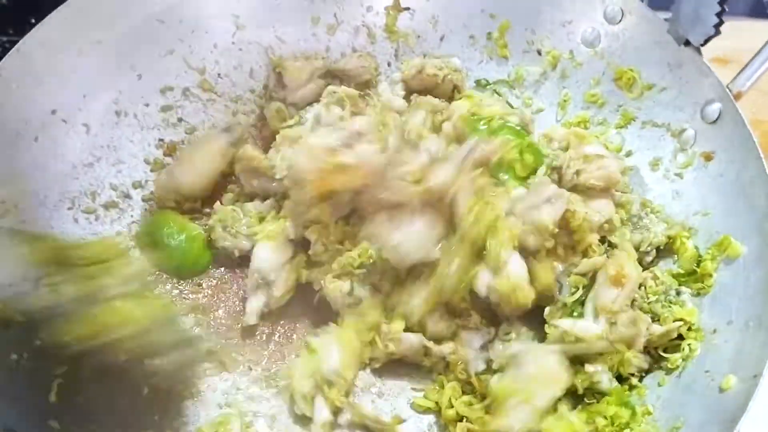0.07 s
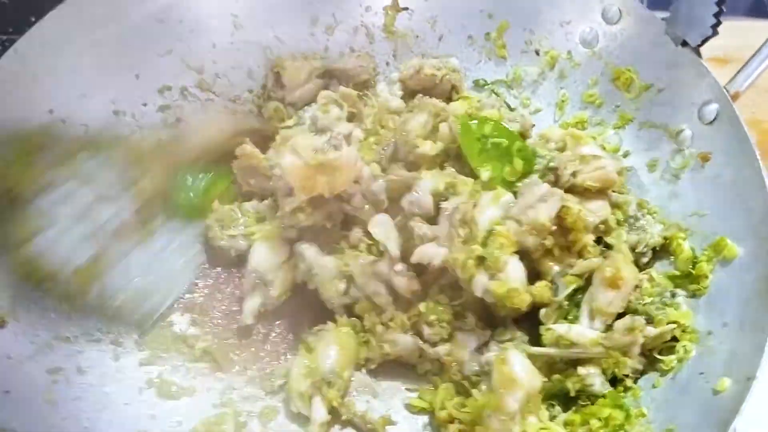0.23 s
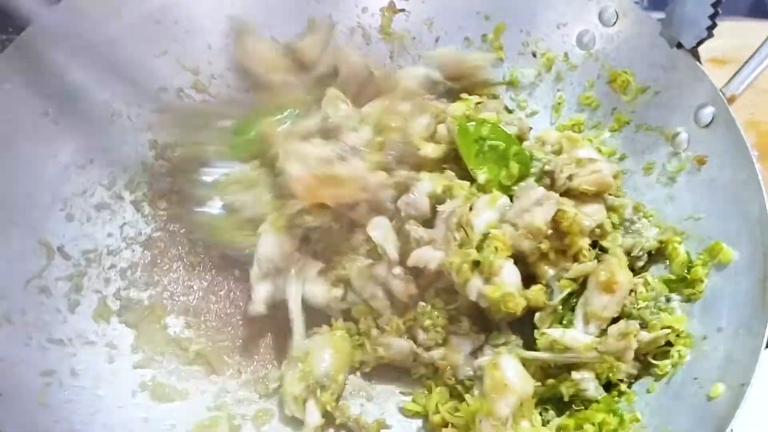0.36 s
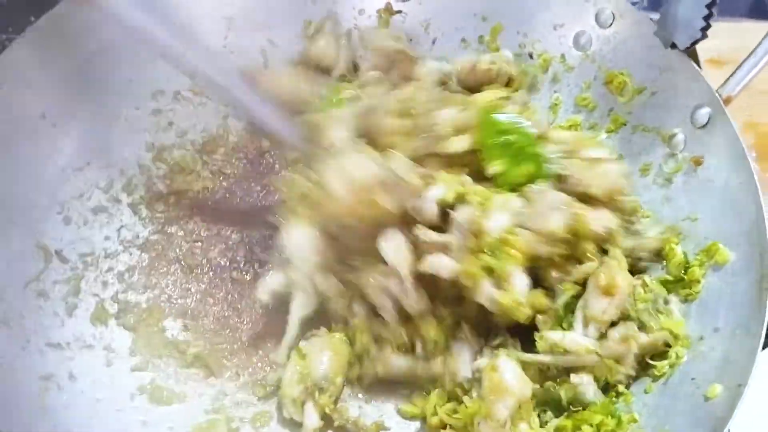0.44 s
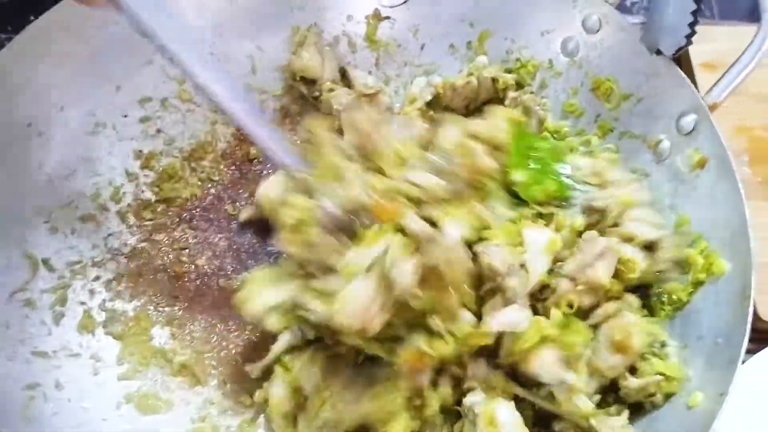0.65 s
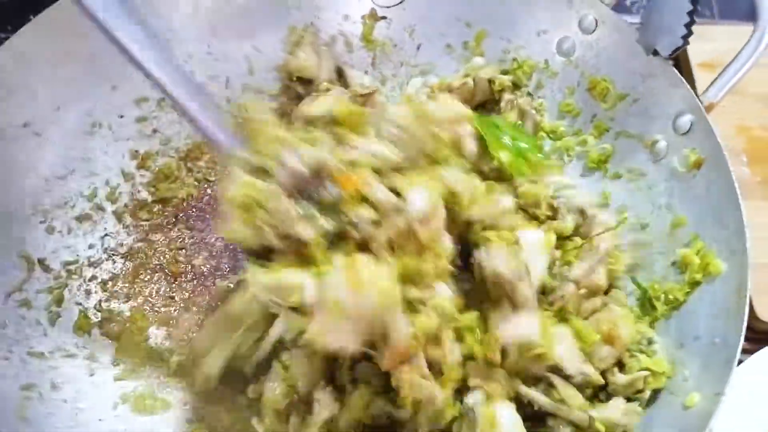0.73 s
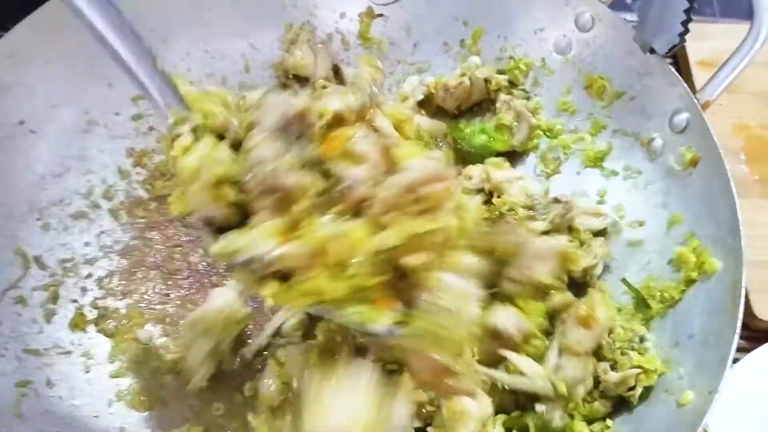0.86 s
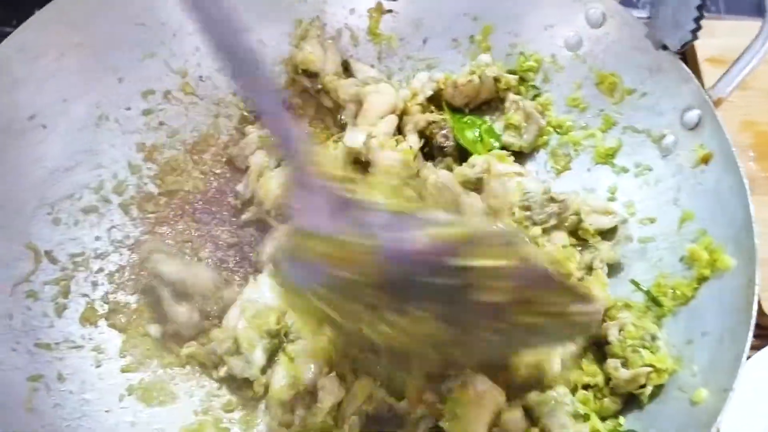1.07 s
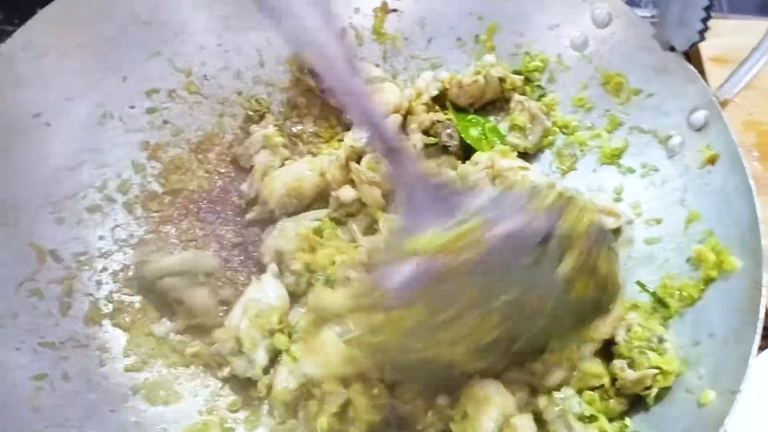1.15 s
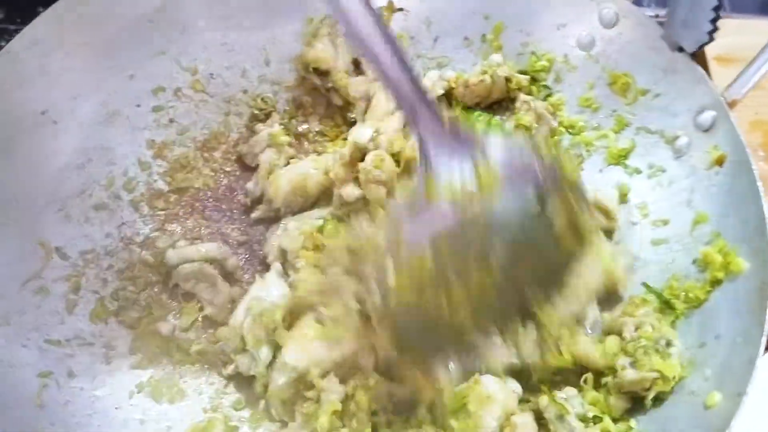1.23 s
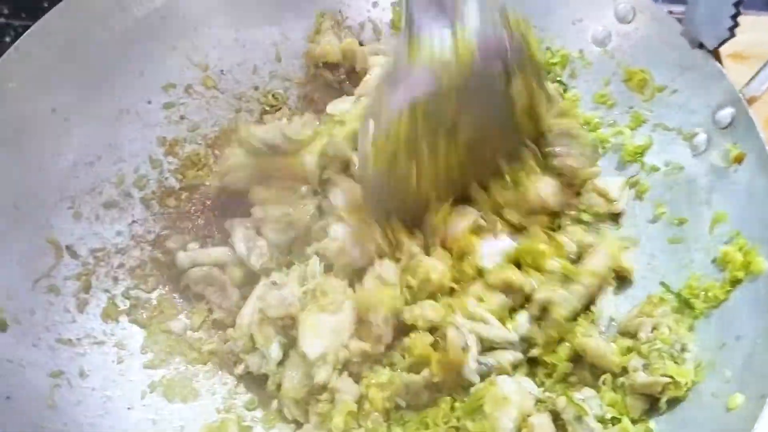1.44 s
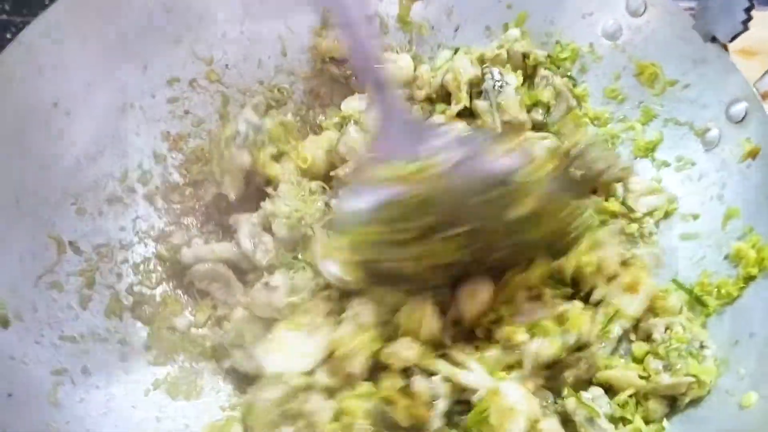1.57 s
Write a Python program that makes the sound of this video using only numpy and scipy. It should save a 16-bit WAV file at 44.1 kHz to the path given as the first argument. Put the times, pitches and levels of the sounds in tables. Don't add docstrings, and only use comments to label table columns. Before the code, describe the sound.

Steel spatula scraping and clanking in a wok, then light taps, over a constant fine sizzle

```python
import sys
import numpy as np
from scipy import signal
from scipy.fft import rfft, irfft
from scipy.io import wavfile
from scipy.ndimage import uniform_filter1d

SR = 44100
rng = np.random.default_rng(int(sys.argv[2]) if len(sys.argv) > 2 else 0)


def to_linear_factor(level_db):
    exponent = np.asarray(level_db, float) / 20
    return 10 ** exponent


def unload_audio(sound):
    columns = np.transpose(np.atleast_2d(sound))
    steps = np.round(np.clip(columns, -1, 1) * 32767)
    wavfile.write(sys.argv[1], SR, steps.astype(np.int16))


N = 70560

# pitch_hz, level_db [per Hz]
AIR_COLOUR = [(20, -27), (60, -1), (140, -7.5), (330, -7), (550, 0.5), (1300, 0.5), (2300, -7), (3500, -23),
              (6000, -43)]
# start_s, sizzle_db, large_bubbles_db
PAN_HEAT = [(0, -41.5, -0.5), (0.119, -41, -0.5), (0.198, -46, 4), (0.301, -44.5, 8.5), (0.353, -32.5, -3),
            (.5, -38.5, -24), (0.528, -36.5, 10.5), (.66, -36.5, 0), (.78, -41, -10), (.86, -43, -1),
            (.95, -44.5, -1), (1.05, -45.5, 0.5), (1.1, -43, 9.5), (1.3, -46.5, 1.5), (1.399, -46, 2.5),
            (1.472, -42, 6), (1.53, -43, 1), (1.6, -44.5, 10)]
# pitch_hz, level_db [per Hz]
SIZZLE_COLOUR = [(880, -42.5), (1500, -13.5), (1940, -2), (2290, -5), (3500, -4.5), (3790, -9.5),
                 (4350, -5), (11400, 3), (15800, -14)]
# start_s, level_db
PAN_ROCKING = [(0, -76), (.16, -47), (.21, -31), (.3, -34), (.35, -25), (.5, -51), (.68, -91), (.87, -67),
               (.91, -50), (1.04, -50.5), (1.09, -53), (1.17, -38.5), (1.32, -58), (1.6, -63)]
# pitch_hz, level_db, t60_s
BOWL_MODES = [(165, -5, 0.03), (246, -11.5, 0.12), (357, -5.5, 0.072), (450, -2, 0.032), (520, 4, 0.056),
              (568, -0.5, 0.051), (607.4, 1, 0.035), (681, -5, 0.073), (838, -5, 0.047), (940, -11, 0.025),
              (1072, -1.5, 0.053)]
# pitch_hz, level_db, t60_s
WALL_MODES = [(1170, 0, .02), (1290, 0, 0.025), (1340, -5, 0.05), (1420, 1, 0.02), (1540, 0, .02),
              (1670, 2, 0.025), (1810, 0, .025)]
# pitch_hz, level_db, t60_s
BLADE_MODES = [(2038, 5, 0.035), (2057, -7, 0.069), (2240, -1.5, 0.044), (2150, 7, 0.028), (2243, 7, 0.046),
               (2434, 14, 0.013), (2760, 5, 0.022), (3276, 12.5, 0.015), (3570, -32, 0.029),
               (3960, -19, 0.014), (4090, 0, 0.018), (5040, -21, .06)]
# pitch_hz, level_db [per Hz]
RASP_COLOUR = [(1470, 3), (2500, -1.5), (2850, -1.5), (4010, 1.5), (5790, -15.5), (6740, -0.5), (9290, -11),
               (12800, -51), (15500, -46)]
# start_s, edge_pressure_db, bowl_load_db, place [0 bowl floor to 1 wall]
LONG_STROKE = [
    (.2, -46, -87, 0.061),
    (.215, -47.5, -45.5, 0.029),
    (.31, -74, -38, 0.015),
    (.335, -36, -35, 0.014),
    (.41, -31.5, -31, 0.037),
    (.46, -35, -31.5, 0.69),
    (.53, -33.5, -36.5, 0.64),
    (.6, -31, -39, 0.32),
    (.65, -45, -50.5, 0.89),
    (.86, -58, -58.5, 0.14),
]
# start_s, edge_pressure_db, bowl_load_db, place [0 bowl floor to 1 wall]
LIGHT_TOSS = [
    (.9, -54, -50.5, 0.06),
    (1.0, -56.5, -85, 0.65),
    (1.06, -58, -88, 0.6),
    (1.07, -42, -42.5, 0.65),
    (1.13, -56, -55, 0.1),
    (1.18, -62, -48, 0.8),
    (1.29, -58, -88, 0.6),
    (1.37, -54.5, -42.5, 0.13),
    (1.46, -99, -93, 0),
]
# start_s, length_s, pitch_hz,
# end_pitch_hz, width_hz
SINGING_RUBS = [(.322, .03, 2250, 2250, 120), (.5, .13, 2120, 2080, 120), (.63, .2, 2620, 2600, 200),
                (.64, .2, 2200, 2000, 250), (.6, .12, 520, 520, 90), (.72, .22, 520, 510, 60),
                (.98, .08, 1335, 1335, 50), (.98, .06, 2200, 2200, 50), (1.015, .045, 3300, 3200, 120),
                (1.165, .05, 1335, 1335, 60), (1.18, .08, 1670, 1670, 80), (1.17, .07, 2230, 2260, 90),
                (1.352, .06, 620, 900, 110), (1.38, .04, 1050, 1100, 80), (.21, .12, 1000, 900, 500),
                (.55, .12, 1300, 1300, 500), (.14, .07, 2150, 2150, 100), (.7, .2, 9200, 9600, 1500),
                (1.3, .09, 3150, 3300, 250)]
SINGING_LEVELS = [-29.5, -25.5, -40, -41, -43.5, -49.5, -48, -50, -46, -37, -43, -42, -41.5, -49.5, -35,
                  -45, -49, -37.5, -45]
# start_s, peak_db, pitch_hz, t60_s
TICKS = [(.322, -26, 300, .03), (.34, -24, 430, .04), (.364, -21, 3820, .03), (.375, -23, 3800, .04),
         (.391, -19, 3760, .025), (.4171, -16, 3950, .015), (.44, -23, 500, .04), (.45, -20, 2260, .03),
         (.474, -17, 1490, .02), (.496, -17, 2280, .02), (.504, -15, 2590, .03), (.536, -18, 2100, .03),
         (.548, -14, 2100, .06), (.573, -16, 2090, .08), (.58, -15, 2075, .07), (.591, -18, 520, .03),
         (.603, -17, 2080, .05), (.604, -20, 650, .03), (.8775, -28, 2250, .012), (.878, -26, 2800, .012),
         (.895, -33, 3000, .03), (.943, -35, 1340, .07), (1.014, -30, 1340, .06), (1.014, -36, 2200, .04),
         (1.159, -19, 1340, .03), (1.159, -20, 1650, .025), (1.159, -22, 2200, .03),
         (1.159, -26, 3200, .015), (1.236, -36, 2250, .06), (1.237, -39, 1335, .07), (1.26, -35, 2280, .04),
         (1.323, -38, 550, .04), (1.364, -34, 600, .04), (1.288, -36, 3000, .012), (1.52, -35, 1400, .02)]
# start_s, peak_db, colour_hz, hardness_db
BLOWS = [(0.207, -12, 648, -22), (0.363, -12.5, 493, -15), (0.392, -20, 500, -8), (0.416, -9, 516, -16),
         (0.476, -12, 520, -12.5), (0.493, -13.5, 560, -33), (0.504, -11.5, 530, -23),
         (0.523, -9.5, 2500, -7.5), (0.877, -22.5, 2880, -7.5), (1.065, -28.5, 554, 10),
         (1.145, -33, 546, 2.5), (1.158, -14, 1470, -27), (1.168, -26.5, 537, -16),
         (1.289, -32.5, 2540, -8), (1.306, -30.5, 530, -29), (1.356, -31, 660, -25)]

GRIT_PER_S, GRIT_SPREAD_DB = 5000, 3.35
EAR_LAG_S, LEAN_DB = 0.0002177, -0.5
SCATTER_HZ = 1250


def evened(x):
    return x / np.sqrt(np.mean(x ** 2) + 1e-20)


def band(x, lo_hz, hi_hz, order=2):
    return signal.sosfilt(signal.butter(order, [lo_hz, hi_hz], "band", fs=SR, output="sos"), x)


def coloured(x, points):
    f, db = np.transpose(points)
    log_hz = np.log(np.fft.rfftfreq(x.shape[-1], 1 / SR) + 1)
    outside = np.maximum(np.log(f[0]) - log_hz, 0) + np.maximum(log_hz - np.log(f[-1]), 0)
    gain_db = np.interp(log_hz, np.log(f), db) - 20 * outside
    return irfft(rfft(x) * to_linear_factor(gain_db), x.shape[-1])


def drift(per_s):
    size = max(int(SR / per_s), 2)
    return evened(uniform_filter1d(uniform_filter1d(rng.standard_normal(N), size), size))


def clicks(per_s, spread_db, shape):
    size = to_linear_factor(spread_db * np.minimum(rng.exponential(1, shape), 5))
    size = size * rng.choice([-1., 1.], shape)
    return evened(size * (rng.random(shape) < per_s / SR))


def placed(x):
    hz = np.fft.rfftfreq(len(x), 1 / SR)
    late = irfft(rfft(x) * np.exp(-2j * np.pi * hz * EAR_LAG_S), len(x))
    return np.array([late * to_linear_factor(LEAN_DB / 2), x * to_linear_factor(-LEAN_DB / 2)])


def spread_out(x, apart=1):
    return placed(x[0]) + apart * x[1:]


def air():
    murmur = coloured(spread_out(rng.standard_normal((3, N)), apart=0.25), AIR_COLOUR)
    return to_linear_factor(-53 + 0.5 * drift(8.1)) * evened(murmur)


def kitchen(x):
    t60_s, level_db, wide_hz, dull_hz = 0.3, -9.5, 920, 7400
    t = np.arange(int(.4 * SR)) / SR
    taps = clicks(2000, 0, (3, len(t))) * to_linear_factor(-60 * t / t60_s) * (t > .004)
    taps = band(taps[:2] - taps[2], wide_hz, 16000) + taps[2]
    taps = band(taps, 160, dull_hz, order=1)
    return signal.fftconvolve(x[None], to_linear_factor(level_db) * taps / np.linalg.norm(taps[0]), axes=1)[:, :N]


def rocking():
    s, db = np.transpose(PAN_ROCKING)
    low = evened(band(rng.standard_normal(N), 111, 206, order=3))
    return placed(low * to_linear_factor(np.interp(np.arange(N) / SR, s, db) - 8 + drift(31)))


def sizzle():
    pops_per_s, pop_spread_db, pop_share = 1800, 5, 0.37
    level_db, flicker_db, patch_db, large_hz = 4, 1, 2.2, 7140
    s, db, large_db = np.transpose(PAN_HEAT)
    level = to_linear_factor(np.interp(np.arange(N) / SR, s, db) + level_db + flicker_db * drift(39.0))
    pops = evened(spread_out(clicks(pops_per_s, pop_spread_db, (3, N))))
    hiss = rng.standard_normal((2, N))
    fizz = coloured(pop_share * pops + (1 - pop_share) * hiss, SIZZLE_COLOUR)
    hz, t, z = signal.stft(fizz, SR, nperseg=256, noverlap=192)
    hz = hz[:, None]
    patch = uniform_filter1d(rng.standard_normal(z.shape[1:]), size=3, axis=0)
    patch = evened(uniform_filter1d(patch, size=50, axis=1))
    large = np.interp(t, s, large_db) / (1 + (hz / large_hz) ** 6) * (hz > 3000)
    z = z * to_linear_factor(patch_db * patch + large)
    return level * signal.istft(z, SR, nperseg=256, noverlap=192)[1][:, :N] / fizz.std()


def ring(modes, weight=None, size=9000):
    hz, db, t60 = np.transpose(modes)[:, :, None]
    t = np.arange(size) / SR
    w = rng.choice([-1., 1.], hz.shape) if weight is None else weight(hz)
    turn_rad = rng.uniform(-1.43, 1, hz.shape) * 2.18 * hz ** 4 / (hz ** 4 + SCATTER_HZ ** 4)
    fade = w * to_linear_factor(db - 60 * t / t60) * np.minimum(t / 0.00075, 1)
    left, right = ((fade * np.sin(2 * np.pi * hz * t + k * turn_rad)).sum(0) for k in (1, -1))
    return np.array([placed(left)[0], placed(right)[1]])


def scrape(curve):
    wall_db, blade_db, blade_rise_db, rasp_db = 7, -3.5, 15, 7
    judder_db, judder_per_s = 1.3, 170
    s, edge_db, load_db, place = np.transpose(curve)
    t = np.arange(N) / SR
    edge, load = (to_linear_factor(np.interp(t, s, v, -120, -120) + judder_db * drift(judder_per_s))
                  for v in (edge_db, load_db))
    place = np.clip(np.interp(t, s, place), 0, 1)
    parts = [(BOWL_MODES, load),
             (WALL_MODES, load * place * to_linear_factor(wall_db)),
             (BLADE_MODES, edge * to_linear_factor(blade_db + blade_rise_db * place))]
    grit = spread_out(clicks(GRIT_PER_S, GRIT_SPREAD_DB, (3, N)))
    rasp = evened(band(coloured(grit, RASP_COLOUR), 2110, 18400, order=4))
    out = edge * to_linear_factor(rasp_db) * rasp
    for modes, force in parts:
        body = ring(modes)
        body = body / np.linalg.norm(body[0])
        push = force * clicks(GRIT_PER_S, GRIT_SPREAD_DB, N)
        out = out + signal.oaconvolve(push[None], body, axes=1)[:, :N]
    return out


def rubs():
    rise_s, side = 0.0017, 0.52
    out, t = np.zeros((2, N)), np.arange(N) / SR
    for (s, length, hz, end_hz, width), db in zip(SINGING_RUBS, SINGING_LEVELS):
        at = slice(round(s * SR), round((s + length) * SR) + 2000)
        done = np.clip((t[at] - s) / length, 0, 1)
        force = np.clip((t[at] - s) / rise_s, 0, 1) * (1 - done) ** .5
        turn = np.exp(2j * np.pi * np.cumsum(hz + (end_hz - hz) * done) / SR)
        r = np.exp(-np.pi * width / SR)
        grit = clicks(GRIT_PER_S, GRIT_SPREAD_DB, (3, len(done)))
        sung = force * (grit[0] + side * grit[1:]) / turn
        for _ in range(2):
            sung = signal.lfilter([1 - r], [1, -r], sung)
        out[:, at] += to_linear_factor(db) * (turn * sung).real * np.sqrt(SR / width)
    return out


def pings():
    rise_s, turn_rad = .001, 1.5
    out, t = np.zeros((2, N + 4000)), np.arange(4000) / SR
    for (s, db, hz, t60), turn in zip(TICKS, rng.uniform(-1.2, 1, len(TICKS))):
        fade = to_linear_factor(db - 60 * t / t60) * np.minimum(t / rise_s, 1)
        left_rad = turn * turn_rad if hz > SCATTER_HZ else -2 * np.pi * hz * EAR_LAG_S
        lead = np.array([[left_rad], [0]])
        out[:, round(s * SR):][:, :len(t)] += fade * np.sin(2 * np.pi * hz * t + lead)
    return out[:, :N]


def knocks():
    octaves, widen_per_db, thud_db = 0.47, -0.23, -32
    blow_s, blow_db, settle_cycles = 0.0072, 18, 1.1
    crack_s, crack_db, level_db = 0.0037, 4.5, 0.5
    out, t = np.zeros((2, N + 9000)), np.arange(9000) / SR
    for s, db, hz, hard_db in BLOWS:
        reach = octaves * np.clip(2.5 + widen_per_db * (db + 16.5), .3, 2)

        def weight(f):
            return np.exp(-.5 * (np.log2(f / hz) / reach) ** 2) + to_linear_factor(thud_db) * (f < 400)

        body = ring(BOWL_MODES + WALL_MODES + BLADE_MODES, weight)
        onset = np.minimum(t * hz / settle_cycles + t / 0.0016, 1) ** 2
        body = body * (1 + to_linear_factor(blow_db) * np.exp(-t / blow_s)) * onset
        body = band(body, 47, min(5 * hz, 12000))
        crack = band(spread_out(rng.standard_normal((3, len(t)))), 950, 10100)
        crack = crack * np.exp(-t / crack_s) * np.minimum(t / 0.0026, 1)
        at = round((s + .0008) * SR)
        hit = body / abs(body).max() + to_linear_factor(hard_db + crack_db) * crack
        out[:, at:at + len(t)] += to_linear_factor(db + level_db) * hit
    return out[:, :N]


def scene():
    steel = knocks() + scrape(LONG_STROKE) + scrape(LIGHT_TOSS) + rubs() + pings()
    steel = band(steel, 126, 12500)
    return steel + kitchen(steel[1]) + sizzle() + air() + rocking()


def band_limit(x):
    return signal.sosfilt(signal.butter(12, 16550, fs=SR, output="sos"), x)


def record(dry):
    cut = signal.sosfilt(signal.butter(2, 62, "high", fs=SR, output="sos"), dry)
    low_pass = signal.firwin(801, 15720, window=("kaiser", 9), fs=SR)
    mix = signal.oaconvolve(cut, low_pass[None], "same")
    return band_limit(mix)


dry = scene()
out = record(dry)
unload_audio(out)
```